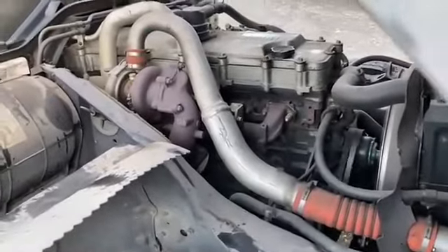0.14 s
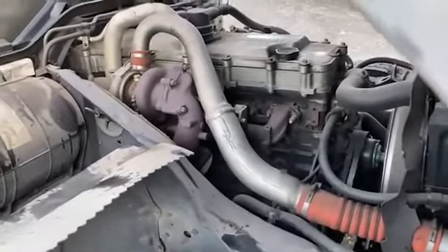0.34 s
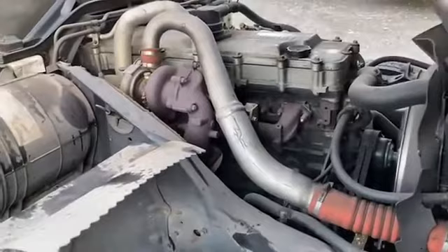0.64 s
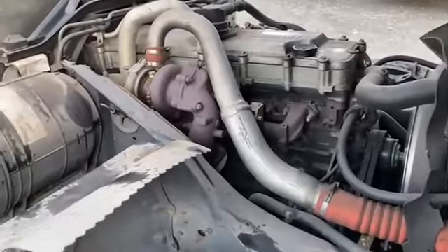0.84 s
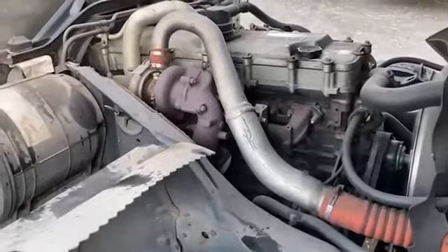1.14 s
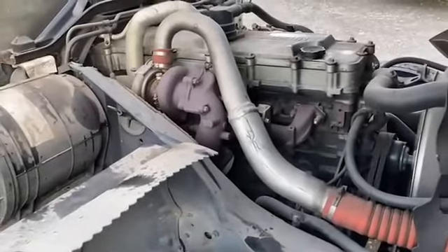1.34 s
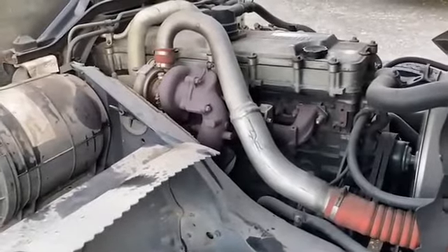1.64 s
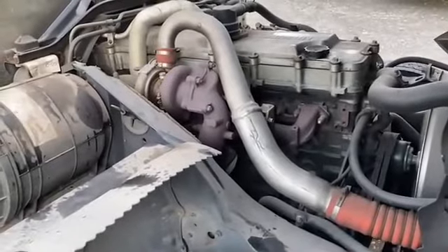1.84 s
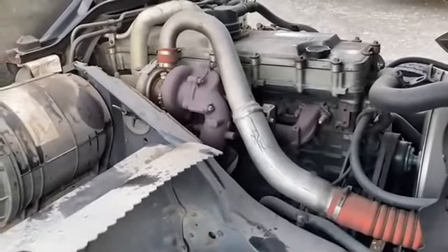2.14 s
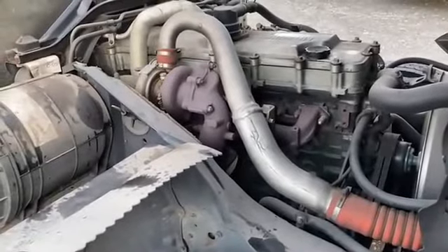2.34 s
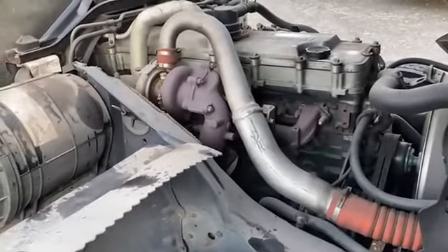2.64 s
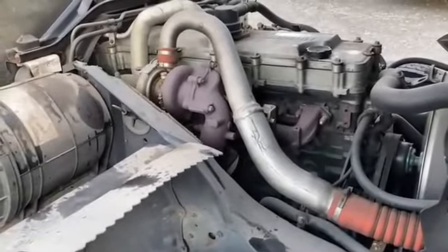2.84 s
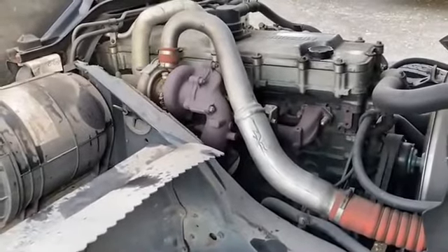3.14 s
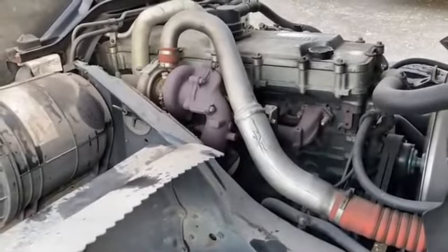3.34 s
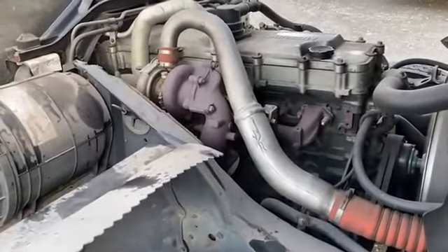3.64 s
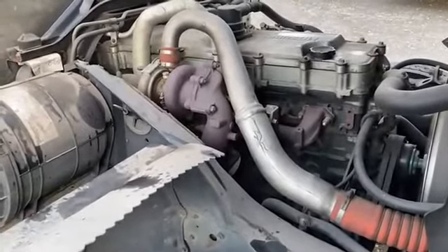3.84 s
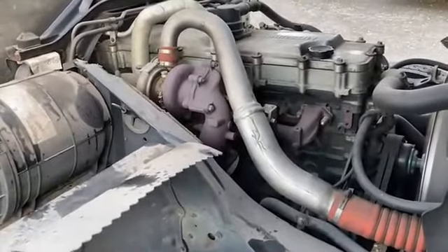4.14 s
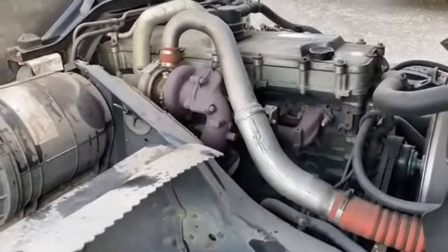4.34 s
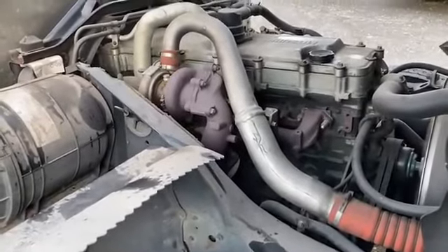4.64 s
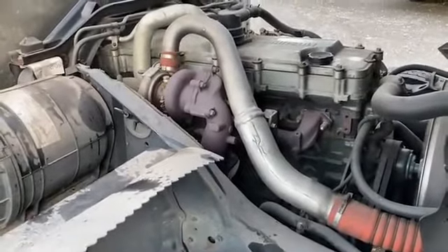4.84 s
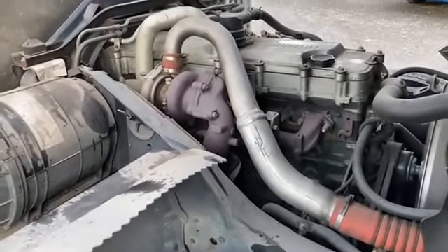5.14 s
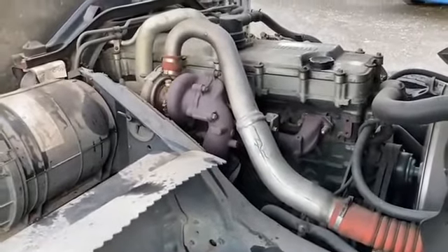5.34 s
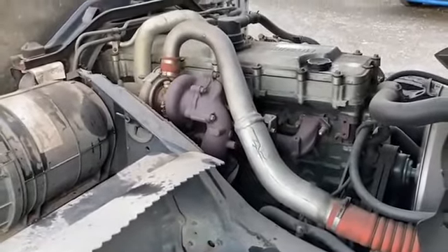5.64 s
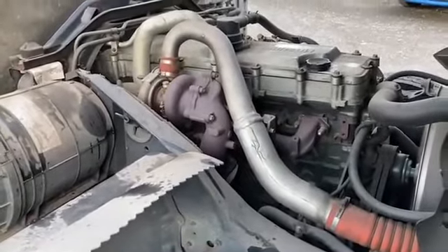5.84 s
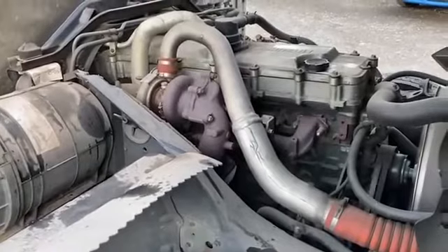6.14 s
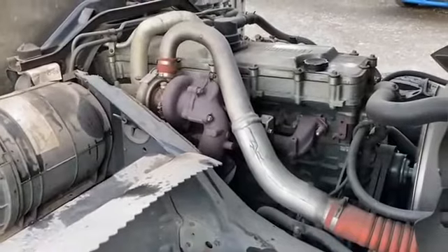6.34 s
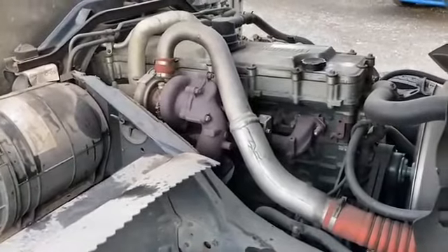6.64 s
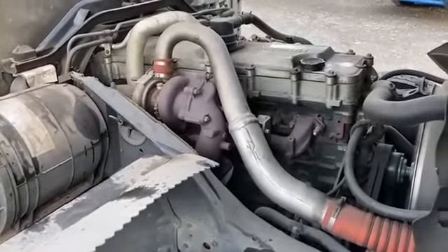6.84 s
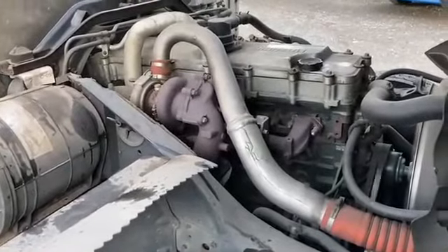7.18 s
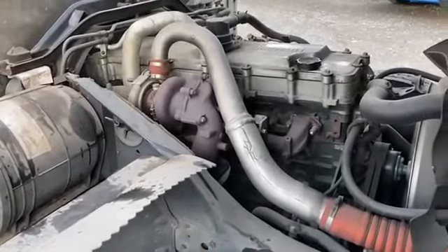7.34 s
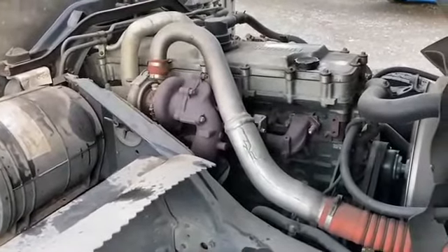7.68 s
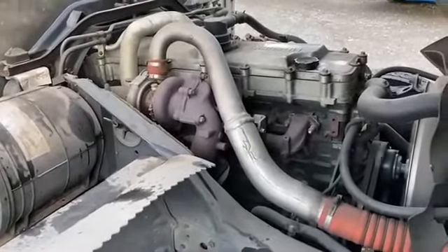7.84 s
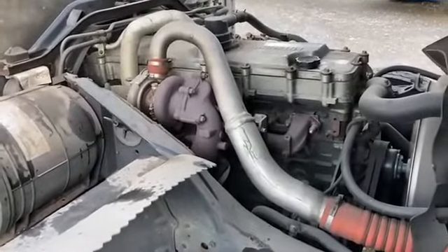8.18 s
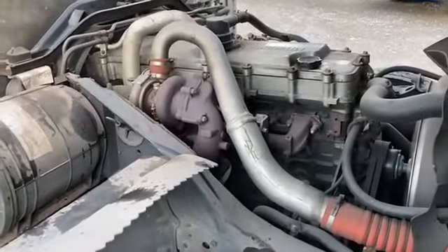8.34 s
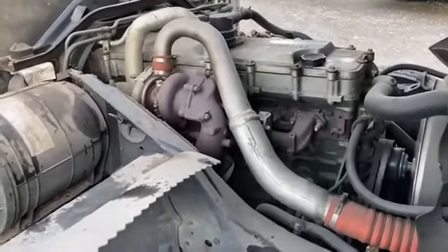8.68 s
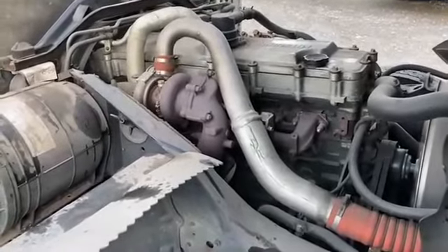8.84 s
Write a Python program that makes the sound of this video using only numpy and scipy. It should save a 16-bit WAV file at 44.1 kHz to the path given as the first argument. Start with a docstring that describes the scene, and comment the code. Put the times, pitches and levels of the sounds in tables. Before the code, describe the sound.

Heavy diesel engine, near and dry in stereo: low rumble, iron knock and fine valve ticking at idle. A sudden rev brings bright, hard clatter and booming exhaust, rising over about three seconds to a dense steady drone with air hiss and a thin high whistle. Fuel is released, pitch and loudness slide down to a quiet idle for nearly two seconds, then a second rev begins abruptly and is cut off.

```python
"""A six-cylinder truck diesel, bonnet open, heard from beside the block: it idles, is revved to full speed,
coasts back to idle without fuel and is revved again. Noise bursts at each cylinder's place knock the iron block;
sines on the firing rate and the four-stroke cycle thump in the pipes over a turbulent rumble.
Shorter bursts tick as valve gear, coloured noise rushes as air through fan and intake,
and a fluttering sine whistles as the turbocharger near full speed."""
import sys
import numpy as np
from scipy import signal
from scipy.fft import rfft, irfft, next_fast_len
from scipy.io import wavfile
from scipy.ndimage import uniform_filter1d

SR = 44100
rng = np.random.default_rng(int(sys.argv[2]) if len(sys.argv) > 2 else 0)


def write(x):
    x = np.atleast_2d(x).T
    wavfile.write(sys.argv[1], SR, np.round(np.clip(x, -1, 1) * 32767).astype(np.int16))


N = 397341
T = np.arange(N) / SR
CYLINDERS = 6
FULL_SPEED = 160  # firings per s

# Engine speed. Each row: time in seconds, firings per second.
SPEED = [(0.0, 29.86), (0.62, 30.31), (0.7, 33.64), (0.9, 45.2), (1.1, 58.7), (1.33, 66.65), (1.58, 81.99),
         (1.98, 97.36), (2.36, 103.98), (3.01, 121.47), (3.16, 133.22), (3.33, 145.5), (3.62, 159.85),
         (4.163, 160.15), (4.52, 132.12), (5.12, 93.68), (5.69, 70.06), (6.55, 39.16), (6.97, 27.44),
         (7.45, 29.85), (8.75, 29.8), (8.86, 32.79), (9.01, 39.89)]
# Anchor of the firing count: time in seconds, number of the firing at that moment.
KNOWN_FIRING = (.629, 19)
# Loudness. Each row: time in seconds, block level in dB, share of extra clatter around BRIGHT_HZ.
LOUDNESS = [(0, -26.5, 0.046), (.61, -27.5, 0.041), (.66, -23, 0.73), (.74, -23.5, 0.66), (.9, -21, 0.8),
            (1.48, -21, 1), (1.6, -22, 0.71), (2.4, -23.5, 0.52), (3.1, -21.5, 0.043), (3.75, -20, 0.086),
            (4.15, -24, 0.086), (4.75, -31, 0.043), (4.95, -33, .05), (5.4, -33.5, 0.054), (5.8, -35.5, .1),
            (6.15, -37, 0.29), (6.55, -39, 0.26), (6.95, -41, .05), (7.35, -41, 0.036), (8.7, -39, 0.037),
            (8.9, -35.5, .1), (9.01, -30.5, 0.35)]

# Turbocharger whistle. Each row: time in seconds, pitch in Hz, level in dB before WHINE_TRIM_DB and flutter.
WHINE = [(2.95, 6500, -66), (3.05, 6900, -43), (3.25, 7800, -44), (3.36, 8400, -37), (3.42, 8600, -36),
         (3.47, 8850, -44), (3.52, 8900, -58), (4.14, 8900, -58), (4.24, 8450, -43), (4.4, 7600, -47),
         (4.52, 7070, -49), (4.8, 6000, -75)]

# Valve gear blows. Each row: place in the cycle in firings, level in dB against the other rows,
# centre in Hz, width in Hz.
VALVE_BLOWS = [(0, 21, 6700, 1500), (0, 27, 4200, 490), (.6, 28.5, 9600, 4000), (1, 27, 3130, 1200),
               (1, 22, 6300, 1500), (1.5, 23, 4600, 2000), (1.85, 30, 5830, 1180), (2.25, 27, 9600, 4000),
               (2.55, 19, 4070, 500), (3.05, 25, 4200, 686), (3.05, 25, 6420, 600), (4, 27.5, 3840, 2510),
               (4.6, 26, 6500, 3000), (5.02, 22, 2780, 120), (5.8, 31.5, 8540, 4000)]
# Broad colour of the valve gear. Each row: frequency in Hz, relative level in dB per Hz.
GEAR_COLOUR = [(1180, -24), (2000, 0.5), (2210, -9), (2420, -5), (2660, -3.5), (3170, -4.5), (4280, -10.5),
               (5420, -11.5), (6360, -14), (8200, -11.5), (10700, -27.5), (18000, -120)]
# Ringing of the valve gear. Each row: centre in Hz, width in Hz, lift over the broad colour in dB.
GEAR_RINGS = [(2730, 60, 4), (3770, 70, 3), (4220, 140, 4), (6220, 80, 4), (6520, 80, 2.5),
              (7050, 250, 2.5)]
# Colour of the fine air hiss. Each row: frequency in Hz, relative level in dB per Hz.
HISS_COLOUR = [(7000, -32), (8500, -34), (9500, 6), (10300, 7), (12300, 11), (12800, 17.5), (13500, -21),
               (14500, -72)]

# Exhaust tones. Each row: time in seconds, mean level in dB at the firing rate, at twice and at three times it.
FIRING_TONES = [(0, -48, -33, -56), (.45, -43, -29.5, -46), (.66, -45, -33, -51), (.78, -25, -49, -22.5),
                (.92, -19, -46, -15.5), (1.05, -19, -22.5, -31.5), (1.2, -29, -22, -42),
                (1.38, -22, -19.5, -35), (1.52, -33, -16, -34), (1.65, -30, -29.5, -37),
                (1.95, -29, -29, -51), (2.35, -54, -32, -43), (2.6, -38, -34.5, -46),
                (2.8, -32.5, -25, -42), (2.98, -27, -28, -52), (3.2, -23, -30.5, -46), (3.4, -19, -50, -34),
                (3.6, -26.5, -27, -42), (3.85, -29, -32, -53), (4.1, -27.5, -33.5, -47),
                (4.4, -26, -36, -42), (4.65, -25.5, -32.5, -59), (4.82, -39, -36, -44),
                (5.05, -48, -41.5, -58), (5.3, -54, -40, -43), (5.6, -54, -39, -61),
                (5.78, -50, -32.5, -45), (6, -43, -42, -47), (6.4, -41, -51, -47), (6.7, -55, -49, -57),
                (7, -60, -42.5, -47), (8.7, -67, -46, -55), (8.9, -54, -43, -47), (9.01, -23, -33, -24)]

# Pressure tones of the four-stroke cycle. Each row: multiple of the cycle rate, relative level in dB
# under fuel, in dB at full speed, in dB coasting.
CYCLE_TONES = [(3, -2, -1, 8), (4, -8, -5, -1), (5, -5, -9, -2), (7, -4, -4, -1), (8, 1, -2, -2),
               (9, 2, 2, -3), (10, -2, 1, 2), (11, 2, -2, -4), (13, -7, -4, -2), (14, -4, -4, -1),
               (15, -8, -11, 3), (16, 3, -8, 4), (17, -10, -6, -6), (20, -1, -4, -6), (21, -7, -14, -10),
               (22, -2, -4, 0), (24, 5, -6, -10), (27, -9, -10, -8), (28, -5, -15, 5), (30, 0, -11, -9),
               (32, -5, -12, 5)]
# Pipe response to those tones. Each row: frequency in Hz, relative gain in dB.
PIPE_RESPONSE = [(25, -28), (48, -0.5), (72, -3), (95, -4), (120, -2), (145, 5.5), (170, -1.5), (250, 2.5),
                 (320, -1), (370, 4), (410, -11), (452, 4), (490, -5), (540, -1), (620, -7)]
# Colour of the low rumble. Each row: frequency in Hz, relative level in dB per Hz.
RUMBLE_COLOUR = [(12, -32), (22, -32), (43, -8), (65, -3), (141, -3.5), (187, -7.5), (228, -3.5),
                 (290, -11), (520, -23), (600, -45), (780, -52), (1320, -120)]
# Swell of the boom as a multiple of the firing rate crosses the pipe resonance. Each row: multiple,
# swell in dB at full fuel, in dB without fuel.
PIPE_CROSSINGS = [(1, 0, -2), (2, -7, 0), (3, 5, -1), (5, 9.5, -3)]

# Sudden hard knocks as the pedal goes down. Each row: start in seconds, drive in dB over the block level.
HARD_KNOCKS = [(.633, 7), (.663, 11), (.724, 10), (.776, 8), (.851, 6), (.912, 11), (.953, 7), (1.029, 10),
               (1.066, 7), (1.133, 7), (8.817, 7), (8.882, 8), (8.964, 9)]
# Colour of the hard knocks. Each row: frequency in Hz, relative level in dB per Hz.
HARD_COLOUR = [(300, -20), (650, -4), (950, 0), (1500, 0), (2000, -4), (2700, -13), (7000, -20),
               (11000, -26), (13000, -50)]

# Each cylinder shakes its own part of the block. Each row: place in the cycle in firings,
# level in dB against the other rows, centre in Hz, width in Hz.
KNOCKS = [(0, -2, 924, 304), (1, -1, 1096, 302), (2, -1.5, 920, 402), (2, -9.5, 1956, 250),
          (3.05, -1.5, 1080, 354), (4, -1.5, 860, 290), (4.05, -4.5, 1400, 302), (5, -4, 1010, 350)]
# Colour of the knock before the iron. Each row: frequency in Hz, relative level in dB per Hz.
KNOCK_COLOUR = [(300, 3.5), (900, -5), (1600, 3), (4000, 6)]
# Broad colour of the iron. Each row: frequency in Hz, relative level in dB per Hz.
BLOCK_COLOUR = [(180, -18), (300, 2), (361, 3), (415, -1), (699, 1.5), (831, -3), (926, 1), (1150, -2.5),
                (1310, -2.5), (2200, -8), (4000, -26.5), (5200, -57), (8800, -120)]
# Ringing of block and covers. Each row: centre in Hz, width in Hz, lift over the broad colour in dB.
BLOCK_RINGS = [(691, 340, 3.5), (918, 58, 3), (1018, 63, 2.5), (1273, 87, 3), (1546, 82, 1.5),
               (1848, 56, 3.5)]
# Shift of the iron's colour at full speed. Each row: frequency in Hz, relative change in dB.
FAST_COLOUR = [(300, -3), (550, -4.5), (800, -0.5), (1120, -1), (1400, 2.5), (2100, 3.5), (4000, -5.5)]
# Higher multiples of the cycle that pistons, pump and timing gears repeat exactly. Each row: multiple of
# the cycle rate, relative level in dB at full speed.
MESH_TONES = [(26, -34), (27, -40), (28, -40), (33, -34), (34, -34), (35, -35), (36, -31), (39, -38),
              (40, -42), (45, -38), (46, -41), (47, -44), (49, -37), (51, -40), (54, -42), (57, -43),
              (59, -39), (60, -45), (61, -41), (62, -44), (63, -41), (66, -45), (67, -44), (69, -43),
              (72, -45), (73, -38), (74, -43), (75, -44), (76, -45), (78, -44), (79, -44), (96, -46),
              (102, -45)]

# Likeness of the two channels. Each row: frequency in Hz, left-right likeness from 0 to 1.
LIKENESS = [(40, .999), (150, .995), (300, .94), (600, .8), (1200, .7), (2400, .45), (4500, .55),
            (8000, .68), (12000, .72)]
# Channel balance. Each row: frequency in Hz, left over right in dB.
LOUDER_LEFT = [(60, 0.0), (120, 0.0), (230, 0.0), (460, 2.0), (910, 4.5), (1800, 6.5), (3560, 4.5),
               (7020, 0.0), (13900, 0.0)]
# Phase between channels. Each row: frequency in Hz, lead of the left in radians.
LEFT_LEADS = [(0, 0), (780, 0.4), (1980, -1.4), (3010, 2.0), (4220, -0.5), (5600, 3.2), (6370, -0.1),
              (7490, 0.1), (8350, -3.1), (9820, -3.2), (10500, -6.3), (12000, -6.2), (12800, -9.3),
              (14000, -9.5)]

# Slowing without fuel: friction (firings per s lost each s) and losses that grow with speed (share lost each s).
FRICTION, PUMPING = 15, .43
# Push at full fuel (firings per s gained each s), the time over which it is smoothed (s),
# and the share of fuel below which the engine begins to coast.
FULL_PUSH, INJECT_S, COAST_FUEL = 140, .12, .15

WHINE_TRIM_DB, WHINE_FLUTTER_DB, WHINE_WOBBLE = -2, 5, .004  # wobble is a share of the pitch
GEAR_DB, GEAR_FAST_DB = -5.5, 3  # valve gear over block: at rest, added at full speed
# Hiss over block: at rest, added at speed, added at full fuel; it stops growing at this many firings per s.
HISS_DB, HISS_FAST_DB, HISS_FUEL_DB, HISS_FULL_SPEED = -14.5, 7.5, -1.5, 68
# Boom over block: at standstill, added at full speed, added at full fuel.
BOOM_DB, BOOM_FAST_DB, BOOM_FUEL_DB = 1, -2, -1
PIPE_HZ, PIPE_WIDTH_HZ = 143, 28
# Share of the boom's power that is tone: at rest, at full speed, added by full fuel at rest.
TONE_IDLE, TONE_FAST, TONE_FUEL = .5, .9, .05
KNOCK_FADE_S = 0.011  # a hard knock's drive falls to 37 % in this time
LOOSE_S = .0002  # spread of each blow about its place
REPEAT_SLOW, REPEAT_FAST = 0.93, 0.44  # share of the knock that repeats each cycle, at rest and at full speed
# Share of the block's drive that is knock, without fuel and at full fuel; part of it lost at full speed.
KNOCK_DRY, KNOCK_FUELLED, KNOCK_BLUR = .1, .9, .45
BRIGHT_HZ, BRIGHT_WIDTH_HZ = 1460, 550
EDGE_HZ = 14400  # upper band limit


def gain_of(db):
    """Decibels to a factor."""
    return 10 ** (np.asarray(db) / 20)


def evened(x):
    """Scales to rms 1."""
    return x / np.sqrt(np.mean(x ** 2) + 1e-20)


def mix(share, a, b):
    """Shares the power between two sounds."""
    share = np.clip(share, 0, 1)
    return np.sqrt(share) * a + np.sqrt(1 - share) * b


def noise():
    """Two unrelated copies of white noise."""
    return rng.standard_normal((2, N))


def drift(count, at=T):
    """A random line through evenly spaced points, for slow unsteadiness."""
    return np.interp(at, np.linspace(0, T[-1], count), rng.standard_normal(count))


def read(points, hz):
    """Value of a spectrum table on a log-frequency axis."""
    f, value = np.transpose(points)
    return np.interp(np.log(hz + 1), np.log(f + 1), value)


def curves(rows):
    """Every column of a table at every sample."""
    s, *columns = np.transpose(rows)
    return [np.interp(T, s, c) for c in columns]


def bump(offset_hz, width_hz):
    """Resonance curve: 1 at the centre, a half at the edges of its width."""
    return 1 / (1 + (2 * offset_hz / width_hz) ** 2)


def peak(x, hz, width_hz):
    """Passes one resonant band."""
    return signal.lfilter(*signal.iirpeak(hz, hz / width_hz, SR), x)


def colour(x, spectrum, rings=(), size=8192):
    """Causal filter: a broad spectrum with resonant bumps, minimum phase."""
    hz = abs(np.fft.fftfreq(size, 1 / SR))
    db = read(spectrum, hz) + sum(lift * bump(hz - f, width) for f, width, lift in rings)
    log_gain = np.log(gain_of(np.maximum(db, -100)))
    taps = np.fft.ifft(np.exp(np.conj(signal.hilbert(log_gain)))).real[:size // 2]
    return signal.oaconvolve(x, taps[None] / np.linalg.norm(taps), axes=1)[:, :N]


def patchy(x, depth_db):
    """Noise swells and sinks unevenly, in bands a few hundred Hz wide, over about a tenth of a second."""
    z = signal.stft(x, nperseg=512)[2]
    patches = rng.standard_normal(z.shape[:0:-1]).T
    patches = uniform_filter1d(patches, size=4, axis=0)  # across frequency
    patches = evened(uniform_filter1d(patches, size=14, axis=1))  # across time
    return signal.istft(z * gain_of(depth_db * patches), nperseg=512)[1][:, :N]


def firing_rate():
    """Firings per second."""
    return curves(SPEED)[0]


def firings():
    """Running count of firings."""
    turns = np.cumsum(firing_rate()) / SR
    known_s, known_count = KNOWN_FIRING
    return turns - turns[round(known_s * SR)] + known_count


def fuel():
    """Fuel 0-1: what it takes to speed up and to overcome the losses."""
    speed = firing_rate()
    push = np.gradient(speed) * SR + FRICTION + PUMPING * speed
    return np.clip(uniform_filter1d(push, round(INJECT_S * SR)) / FULL_PUSH, 0, 1)


def burn():
    """Shares 0-1 of knock, of repeating knock and of tone in the boom, following speed and fuel."""
    pace, load = firing_rate() / FULL_SPEED, fuel()
    knock_share = KNOCK_DRY + (KNOCK_FUELLED - KNOCK_DRY) * np.sqrt(load)
    knock_share = knock_share * (1 - KNOCK_BLUR * pace)
    repeat = REPEAT_SLOW + (REPEAT_FAST - REPEAT_SLOW) * pace
    tone_share = TONE_IDLE + (TONE_FAST - TONE_IDLE) * pace + TONE_FUEL * (1 - pace) * load
    return knock_share, repeat, tone_share


def levels():
    """dB of block, boom, valve gear and hiss: all follow the block, shifted by speed, fuel and pipe resonance."""
    block_db, speed, load = curves(LOUDNESS)[0], firing_rate(), fuel()
    pace = speed / FULL_SPEED
    swell_db = sum((dry_db + (full_db - dry_db) * load) * bump(round(k) * speed - PIPE_HZ, PIPE_WIDTH_HZ)
                   for k, full_db, dry_db in PIPE_CROSSINGS)
    boom_db = block_db + BOOM_DB + BOOM_FAST_DB * pace + BOOM_FUEL_DB * load + swell_db
    gear_db = block_db + GEAR_DB + GEAR_FAST_DB * pace
    hiss_growth = np.minimum(speed / HISS_FULL_SPEED, 1)
    hiss_db = block_db + HISS_DB + HISS_FAST_DB * hiss_growth + HISS_FUEL_DB * load
    return block_db, boom_db, gear_db, hiss_db


def blows(places, t60, rise, uneven_db, repeat, focus_db):
    """Dying bursts at fixed places of the cycle: one part is the same each cycle, one is new; two unrelated copies."""
    turns, t = firings(), np.arange(2048) / SR
    fade = gain_of(-60 * t / t60) * (1 - np.exp(-t / rise))
    out = np.zeros((2, N))
    for place, db, hz, width in places:
        hit = np.diff(np.floor((turns - place) / CYLINDERS), prepend=0) == 1
        uneven, late = rng.standard_normal((hit.sum(), 2)).T
        moments = np.flatnonzero(hit) + (LOOSE_S * SR * late).astype(int)
        train = np.zeros(N)
        train[np.clip(moments, 0, N - 1)] = gain_of(db + uneven_db * uneven)
        same = signal.oaconvolve(train[None], fade * rng.standard_normal((2, len(t))), axes=1)[:, :N]
        fresh = np.sqrt(abs(signal.oaconvolve(train ** 2, fade ** 2)[:N])) * noise()
        burst = mix(repeat, same, fresh)
        struck_part = peak(burst, hz, width) * np.sqrt(hz / width / 2)
        out += burst + gain_of(focus_db) * struck_part
    # faster running packs more blows into a second: keep the mean power steady
    return evened(out / np.sqrt(firing_rate()))


def tones(orders, response, waver_db, scatter, place=0):
    """Slowly wavering sines at multiples of the cycle, at response(multiple, Hz, rest of the row) dB; power 1.

    A small scatter of starting phase from one sine to the next (in turns, more across gaps) bunches
    neighbours into one throb a cycle, at the given place (in firings)."""
    slow = T[::256]
    cycle_hz = firing_rate()[::256] / CYLINDERS
    angle = 2 * np.pi * ((firings() - place) / CYLINDERS % 1)
    gaps = np.diff(np.transpose(orders)[0], prepend=0)
    starts = 2 * np.pi * np.cumsum(scatter * gaps ** 2 * rng.standard_normal(len(orders)))
    out, power = np.zeros(N, complex), np.zeros(len(slow))
    for (k, *row_db), start in zip(orders, starts):
        size = gain_of(response(k, k * cycle_hz, *row_db) + waver_db * drift(90, slow))
        out += np.interp(T, slow, size) * np.exp(1j * (round(k) * angle + start).astype(np.float32))
        power += size ** 2 / 2
    # the scattered copy is a quarter turn late
    return np.array([out.real, out.imag]) / np.sqrt(np.interp(T, slow, power))


def whine():
    """Turbocharger whistle: a thin sine that follows the spool, fluttering in level and pitch."""
    hz, db = curves(WHINE)
    size = gain_of(db + WHINE_TRIM_DB + WHINE_FLUTTER_DB * drift(280))
    turns = np.cumsum(hz * (1 + WHINE_WOBBLE * drift(1500))) / SR
    z = size * np.exp(2j * np.pi * turns)
    return np.sqrt(2) * np.array([z.real, z.imag])


def valve_gear():
    """Valve and injector ticks strike small parts; the same ticks and rushing air also feed a fine hiss."""
    ticks = blows(VALVE_BLOWS, t60=.07, rise=.003, uneven_db=1.3, repeat=.6, focus_db=10)
    tick_share = 0.51 * (firing_rate() / 30) ** -.45  # air takes over with speed
    air = evened(patchy(noise(), depth_db=2.5))
    drive = mix(tick_share, ticks, air)
    gear_db, hiss_db = levels()[2:]
    gear = gain_of(gear_db) * evened(colour(drive, GEAR_COLOUR, GEAR_RINGS))
    hiss = gain_of(hiss_db) * evened(colour(drive, HISS_COLOUR))
    return gear + hiss


def exhaust():
    """Exhaust pulses as clean sines on the firing rate and its first multiples, slightly unsteady in level."""
    z = np.zeros(N, complex)
    for k, db in enumerate(curves(FIRING_TONES), start=1):
        z += gain_of(db + 2.6 * drift(150)) * np.exp(2j * np.pi * (k * firings() % 1))
    return np.sqrt(2) * np.array([z.real, z.imag])


def boom():
    """Tones of the cycle, lifted where they cross a pipe resonance, over low turbulent rumble."""
    fast = np.clip(firing_rate()[::256] / FULL_SPEED, 0, 1) ** 5
    coast = np.clip(1 - fuel()[::256] / COAST_FUEL, 0, 1)

    def level(k, hz, fuelled_db, fast_db, coast_db):
        """Blends the fuelled, coasting and full-speed levels, then adds the pipes."""
        slow_db = fuelled_db + (coast_db - fuelled_db) * coast
        return slow_db + (fast_db - slow_db) * fast + read(PIPE_RESPONSE, hz)

    pulses = tones(CYCLE_TONES, level, waver_db=3, scatter=1)
    rumble = colour(noise(), RUMBLE_COLOUR)
    tone_share = burn()[2]
    return gain_of(levels()[1]) * mix(tone_share, pulses, rumble)


def hard_knocks():
    """Single sudden noise bursts that ring the block and die quickly."""
    power = sum(gain_of(2 * db) * (T >= s) * np.exp(-2 * abs(T - s) / KNOCK_FADE_S) for s, db in HARD_KNOCKS)
    return gain_of(levels()[0]) * colour(np.sqrt(power) * noise(), HARD_COLOUR, BLOCK_RINGS)


def block():
    """Combustion knock and dense clatter ring the iron; a comb of exact repeats grows with speed."""
    knock_share, repeat = burn()[:2]
    pace = firing_rate() / FULL_SPEED
    knock = blows(KNOCKS, t60=.075, rise=.004, uneven_db=.6, repeat=repeat, focus_db=11)
    # a sharp blow rings the modes harder than clatter does
    knock = evened(colour(knock, KNOCK_COLOUR, BLOCK_RINGS))
    clatter = evened(patchy(noise(), depth_db=1.56))
    iron = colour(mix(knock_share, knock, clatter), BLOCK_COLOUR, BLOCK_RINGS)
    iron = iron + pace ** 2 * (colour(iron, FAST_COLOUR) - iron)
    iron = iron + curves(LOUDNESS)[1] * peak(iron, BRIGHT_HZ, BRIGHT_WIDTH_HZ)

    def comb_level(k, hz, db):
        """Each multiple takes the colour of the iron at the pitch it passes."""
        return db + read(BLOCK_COLOUR, hz) - read(BLOCK_COLOUR, k * FULL_SPEED / CYLINDERS)

    comb = tones(MESH_TONES, comb_level, waver_db=1.1, scatter=.06, place=1.5)
    return gain_of(levels()[0]) * mix(.8 * pace ** 4, comb, iron)


def scene():
    """Two copies of the engine sound, near and scattered."""
    return whine() + valve_gear() + exhaust() + boom() + hard_knocks() + block()


def record(dry):
    """A close pair of microphone ports shares part of the sound and overloads softly; then the band limit."""
    size = next_fast_len(N)
    hz = np.fft.rfftfreq(size, 1 / SR)
    near, scattered = rfft(dry, size)
    same = np.clip(read(LIKENESS, hz), -1, 1)
    right = same * near + np.sqrt(1 - same ** 2) * scattered
    right = right * np.exp(-1j * np.interp(hz, *np.transpose(LEFT_LEADS)))
    tilt = gain_of(read(LOUDER_LEFT, hz) / 2)  # half up on the left, half down on the right
    pair = 0.83 * irfft([near * tilt, right / tilt], size)[:, :N]
    pair = 1.15 * np.tanh(pair / 1.15)  # the loudest peaks round off
    band_limit = signal.firwin(511, EDGE_HZ, window=("kaiser", 9), fs=SR)
    return signal.oaconvolve(pair, band_limit[None], "same")


dry = scene()
out = record(dry)
write(out)
```